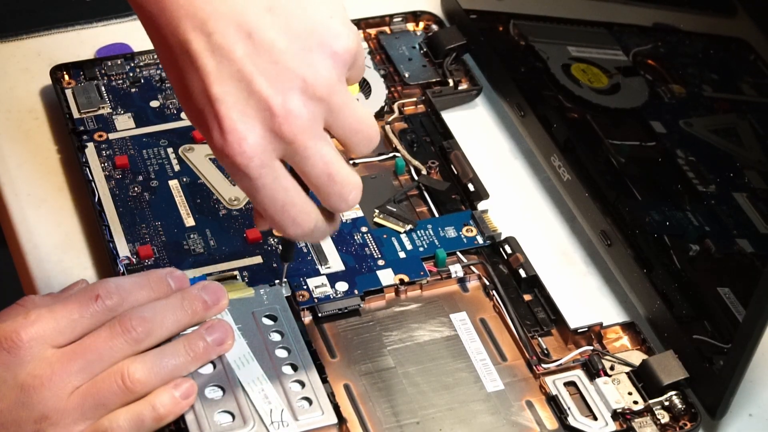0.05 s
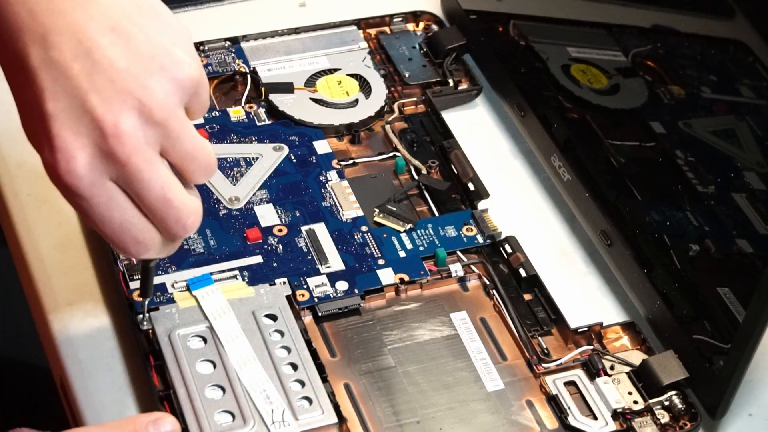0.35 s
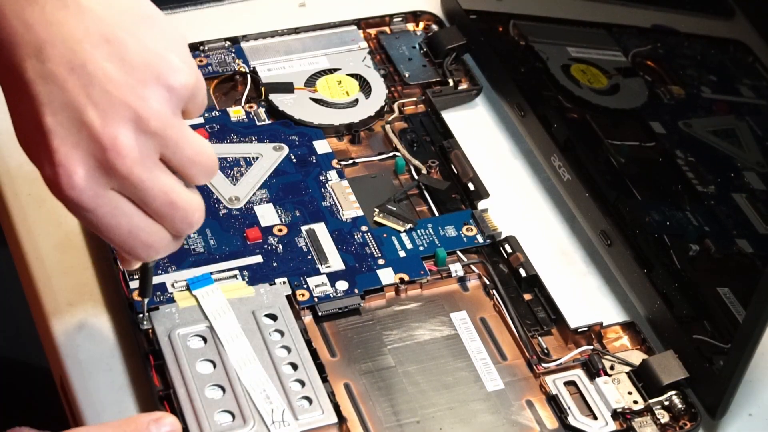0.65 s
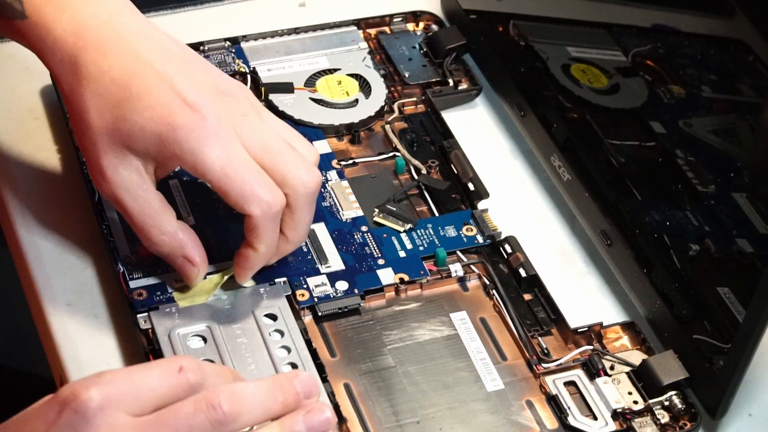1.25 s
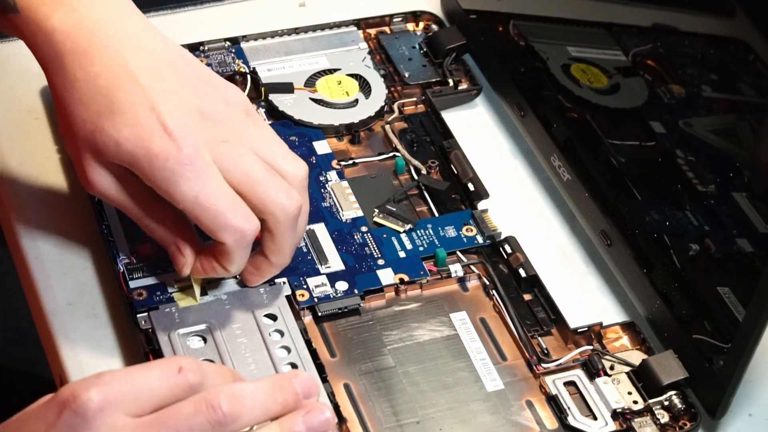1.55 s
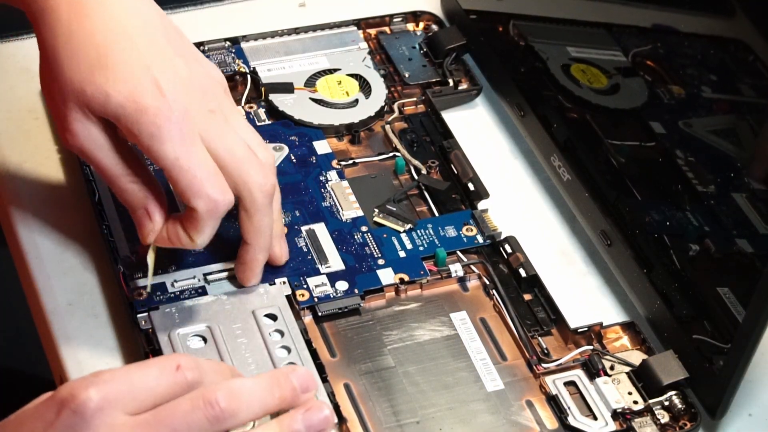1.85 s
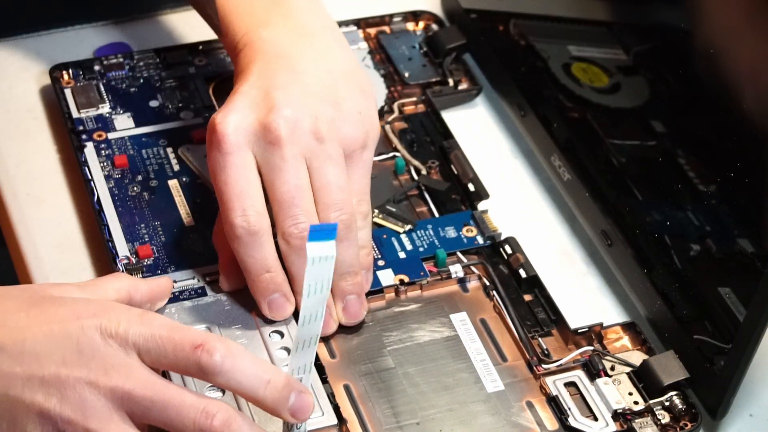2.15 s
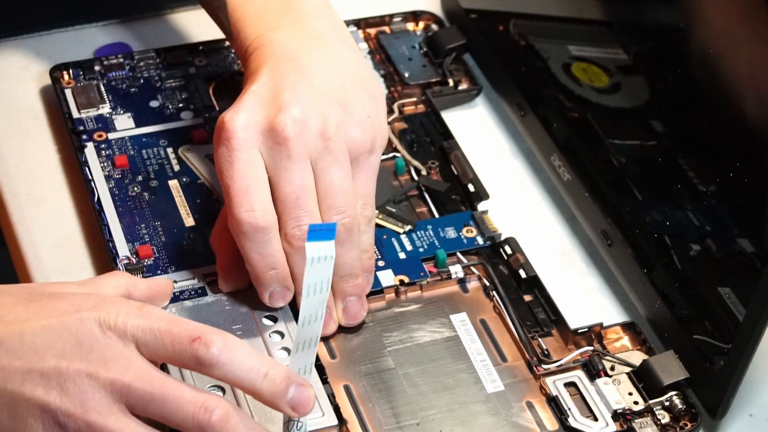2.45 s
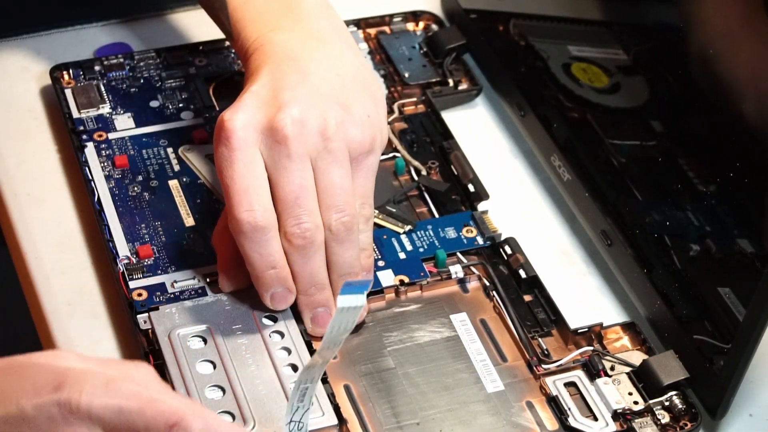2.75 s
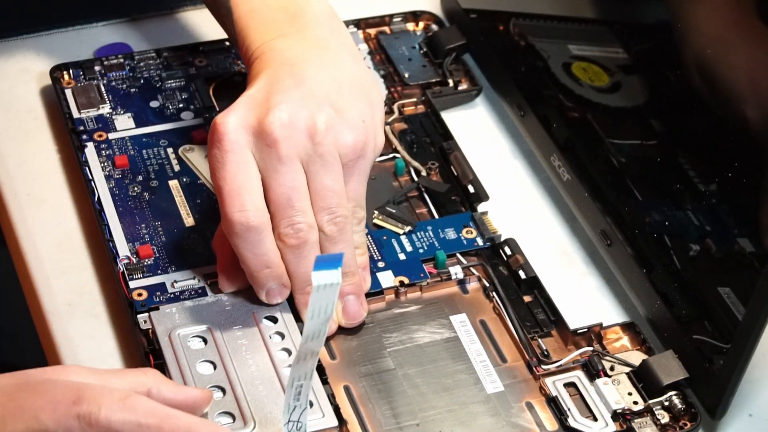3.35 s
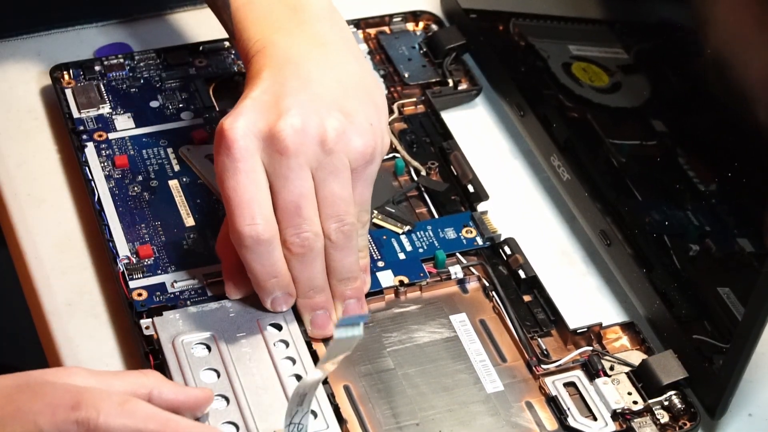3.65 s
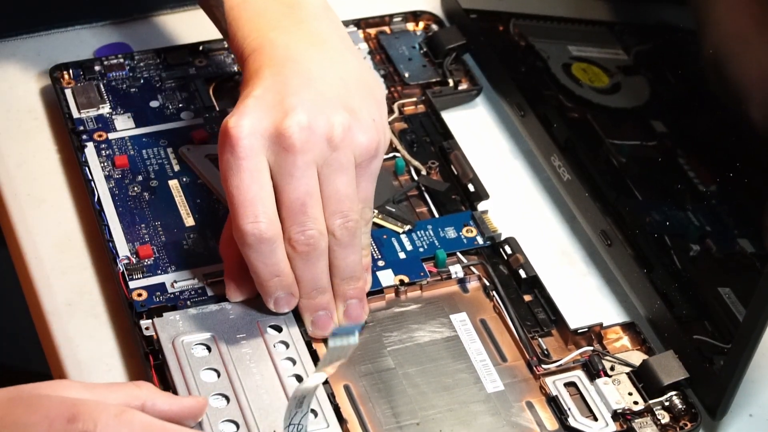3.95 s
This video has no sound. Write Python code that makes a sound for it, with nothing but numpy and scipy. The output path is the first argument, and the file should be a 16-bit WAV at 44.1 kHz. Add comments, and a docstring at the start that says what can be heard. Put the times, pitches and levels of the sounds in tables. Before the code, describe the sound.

A plastic part snaps loudly past its catch in an opened laptop. Before it, fingertips softly brush and tick, tape crackles off in two short runs, and a ribbon cable faintly squeaks. Close up in a quiet room.

```python
"""Inside an opened laptop

Close up in a quiet room, fingertips brush and tick on the parts. A strip of tape tears off the metal
drive bracket in two runs of small snaps as its glue lets go, and a ribbon cable is folded back with a
faint squeak. Then a part is pressed past its catch, and one loud snap shakes the plastic chassis."""
import sys
import numpy as np
from scipy import signal
from scipy.fft import rfft, irfft
from scipy.io import wavfile

SR = 44100
rng = np.random.default_rng(int(sys.argv[2]) if len(sys.argv) > 2 else 0)


def digitize_waveform(pressure):
    """Quantize a signal to 16-bit integers and store it at the path in sys.argv[1].

    Rows of a 2-D input are taken as channels; values are limited to [-1, 1].
    """
    field = np.atleast_2d(pressure).T
    bounded = np.clip(field, -1, 1)
    quanta = np.round(bounded * 32767).astype(np.int16)
    wavfile.write(sys.argv[1], SR, quanta)


N = 176400
TIME = np.arange(N) / SR
BAND_EDGES_HZ = np.geomspace(22, 18000, 21)
BAND_CENTRES_HZ = np.sqrt(BAND_EDGES_HZ[1:] * BAND_EDGES_HZ[:-1])


def from_db(db):
    """Decibels to gain."""
    return 10 ** (np.asarray(db) / 20)


def at_hz(curve, hz):
    """Read a curve on a log-frequency axis."""
    freqs, values = np.transpose(curve)
    return np.interp(np.log(hz), np.log(freqs), values)


def band(x, index):
    """One half-octave band."""
    sos = signal.butter(2, BAND_EDGES_HZ[index:index + 2], "band", fs=SR, output="sos")
    return signal.sosfilt(sos, x + 1e-18)


def low_cut(x, hz):
    """Roll off the bass."""
    return signal.sosfilt(signal.butter(2, hz, "high", fs=SR, output="sos"), x)


def decay(t60):
    """Gain per sample that loses 60 dB in t60 seconds."""
    return np.exp(-np.log(1000) / (t60 * SR))


def impulses(times, heights):
    """Single-sample spikes."""
    return np.bincount((times * SR).astype(int), heights, N)[:N]


def equalise(x, bells):
    """A chain of resonant peaks and dips."""
    for hz, q, db in bells:
        w, gain = 2 * np.pi * hz / SR, from_db(db / 2)
        width, middle = np.sin(w) / (2 * q), -2 * np.cos(w)
        zeros = [1 + width * gain, middle, 1 - width * gain]
        poles = [1 + width / gain, middle, 1 - width / gain]
        x = signal.lfilter(zeros, poles, x)
    return x


def ring(times, hit_db, modes, longest_cycles=170):
    """Each hit sets a body's modes ringing; damping caps their t60, keeping the high ones short."""
    drive = impulses(times, from_db(hit_db)) + 1e-18
    out = 0
    for k, (hz, db, t60) in enumerate(modes):
        r, w = decay(min(t60, longest_cycles / hz)), 2 * np.pi * hz / SR
        mode = signal.lfilter([0, np.sin(w)], [1, -2 * r * np.cos(w), r * r], drive)
        out += (-1) ** k * from_db(db) * mode
    return out


# where a contact's thump, body, click and sizzle sit: (frequency [Hz])
REGISTERS = [200, 900, 4500, 11000]

def contacts(times, levels, ring_times, crack_share):
    """Each contact is a sharp crack and a dense, dying ring; 0 dB has the energy of 1 ms of white noise."""
    out, white = 0, rng.standard_normal((2, N))
    for k, hz in enumerate(BAND_CENTRES_HZ):
        band_db = [np.interp(np.log(hz), np.log(REGISTERS), row) for row in levels]
        hits = impulses(times, np.sqrt(SR / 1000) * from_db(band_db))
        sustain = decay(at_hz(ring_times, hz)) ** 2
        power = signal.lfilter([1 - sustain], [1, -sustain], hits ** 2 + 1e-18)
        crack = (-1) ** k * np.sqrt(crack_share) * hits
        tail = np.sqrt((1 - crack_share) * power) * white[k % 2]
        out += band(crack + tail, k)
    return out


def swell(peak_s, rise_s, fall_s):
    """A bell-shaped envelope with its own attack and release."""
    width = np.where(TIME < peak_s, rise_s, fall_s)
    return np.exp(-np.minimum(((TIME - peak_s) / width) ** 2, 50))


def friction(strokes, spectrum, grains_per_s, spread_db, grain_t60, hiss):
    """Tiny uneven slips, each a brief burst, over a smooth hiss; both swell and fade with each stroke."""
    slips = rng.random(N) < grains_per_s / SR
    grains = slips * from_db(spread_db * np.minimum(rng.exponential(1, N), 3.5))
    bursts = signal.lfilter([1], [1, -decay(grain_t60) ** 2], grains ** 2 + 1e-18)
    texture = rng.standard_normal(N) * np.sqrt((bursts / bursts.mean() + hiss ** 2) / (1 + hiss ** 2))
    envelopes = np.array([swell(*stroke[:3]) for stroke in strokes])
    db, tilt = np.transpose(strokes)[-2:]
    out = 0
    for k, hz in enumerate(BAND_CENTRES_HZ):
        stroke_db = db + tilt * np.log2(hz / REGISTERS[2]) + at_hz(spectrum, hz)
        power = from_db(stroke_db) ** 2 @ envelopes
        out += (-1) ** k * band(texture * np.sqrt(power), k)
    return low_cut(out, hz=140)


# the dark bed of room air: (frequency [Hz], relative level [dB])
AIR_SPECTRUM = [(15, -37), (25, 2), (70, -6.5), (127, 1.5), (185, -6.5), (354, -2.5), (427, -6),
                (818, -10.5), (988, -15.5), (1400, -22), (5880, -26), (14800, -30), (16000, -31.5)]

def room_tone(air_db=-61.5, hum_hz=130, hum_db=-69):
    """Steady soft air and a faint mains hum."""
    hz = np.maximum(np.arange(N // 2 + 1) * SR / N, 1)
    air = irfft(rfft(rng.standard_normal(N)) * from_db(at_hz(AIR_SPECTRUM, hz)), N)
    hum = np.sin(2 * np.pi * hum_hz * TIME)
    return low_cut(from_db(air_db) * air / air.std() + from_db(hum_db) * hum, hz=30)


# soft fingertip strokes: (peak time [s], rise [s], fall [s], level [dB], tilt [dB/octave])
RUBS = [(.005, 0.017, 0.041, -56, -1), (.175, 0.0058, 0.011, -62.5, -1), (.235, 0.025, 0.012, -58, 1),
        (.35, 0.065, 0.098, -62, -1), (.455, 0.021, 0.012, -61, 4), (.55, 0.035, 0.031, -65, -1),
        (.678, 0.036, 0.043, -55, 0), (.9, 0.016, .018, -59.5, -0.5), (.955, 0.032, 0.044, -61, 0),
        (1.05, 0.023, 0.014, -63, -2), (1.17, 0.02, 0.021, -54.5, 2), (1.225, 0.025, 0.0042, -58.5, 0.5)]
# the warm tone of a rub: (frequency [Hz], level [dB])
RUB_SPECTRUM = [(100, 13), (300, 10), (1100, 1), (2500, 4.5), (4800, -1.5), (8000, -7), (12000, -10),
                (16000, -11)]
# boxy plastic resonances, shared by rubs, taps and snap: (frequency [Hz], Q, gain [dB])
PLASTIC_EQ = [(198, 9, 0), (526, 11, 4), (760, 8.1, 2.5), (890, 12, 5), (1000, 11, -5), (1176, 7, 3.5),
              (1450, 14, -1), (2410, 1.58, -3.5), (5300, 6.9, 2.5), (15000, 1.4, -6)]

def finger_rubs():
    """Fingertips brush over the parts, and the plastic colours their friction."""
    rubs = friction(RUBS, RUB_SPECTRUM, grains_per_s=300, spread_db=2.5, grain_t60=0.02, hiss=0.68)
    return equalise(rubs, PLASTIC_EQ)


# light ticks on the parts: (time [s], thump [dB], body [dB], click [dB], sizzle [dB])
TAPS = [(0.351, -25, -55, -40, -50), (0.375, -36, -44, -38, -50), (0.439, -22, -31.5, -37, -93),
        (0.6397, -30, -39.5, -38, -53), (0.668, -42, -39, -54, -46), (0.6985, -39, -31, -29.5, -94),
        (0.8786, -23.5, -33.5, -34, -44.5), (0.899, -31, -47, -42, -57), (0.933, -36, -37, -40.5, -69),
        (0.9761, -39, -35, -32, -85), (1.122, -34, -36, -37.5, -45), (1.148, -22, -38.5, -28, -36),
        (1.194, -23, -39, -38, -70), (1.455, -27, -41, -37, -49.5), (2.209, -27, -20.5, -28, -41),
        (2.252, -35, -34.5, -43.5, -53), (2.4365, -50, -31, -33, -47.5), (2.4435, -21.5, -48, -36, -54),
        (2.663, -45, -30.5, -35, -49), (2.704, -34, -41, -35, -47), (3.2893, -14, -13, -28.5, -38.5),
        (3.713, -18, -23.5, -43, -69), (3.932, -22.5, -32.5, -54.5, -61)]
# the tail of a tap: (frequency [Hz], t60 [s])
TAP_RING = [(150, 0.27), (900, 0.11), (2500, 0.037), (6000, 0.031), (13000, .014)]
# hollow chassis modes, shared by taps and snap: (frequency [Hz], level [dB], t60 before the cap [s])
CHASSIS_MODES = [(76, -37, 0.26), (118, -28, 0.17), (142.6, -24, 0.18), (161.4, -33, 0.31),
                 (224, -30.5, .14), (252, -28, 0.24), (275, -32.5, .26), (296.6, -32.5, .12),
                 (322, -30.5, 0.14), (346.5, -27.5, 0.16), (410, -36.5, .1), (499, -28, 0.069),
                 (540.6, -31, 0.13), (896, -37.5, 0.068), (1066, -33, 0.18), (1216, -34.5, 0.12),
                 (1450, -37, 0.14), (1550, -35.5, .12)]

def taps():
    """Nails and cable tick on the plastic and the board; each thump softly rings the chassis."""
    rows = np.array(TAPS)
    times, levels = rows[:, 0], rows[:, 1:]
    ticks = low_cut(contacts(times, levels, TAP_RING, crack_share=0.17), hz=120)
    chassis = ring(times, levels[:, 0], CHASSIS_MODES)
    return equalise(ticks, PLASTIC_EQ) + from_db(-10.5) * chassis


# the glue lets go in jerks: (time [s], thump [dB], body [dB], click [dB], sizzle [dB])
TAPE_JERKS = [(1.55, -35, -37, -33.5, -38), (1.555, -36, -43, -34, -44), (1.5657, -35, -30, -39, -38),
              (1.572, -16, -16.5, -16.5, -21.5), (1.5858, -21, -22, -17.5, -21),
              (1.5944, -11, -20.5, -13, -23), (1.607, -17.5, -25, -18, -28), (1.728, -51, -38, -32, -39),
              (1.7368, -31, -31, -38, -33), (1.754, -34, -40, -38, -35), (1.7698, -24.5, -25, -29, -26.5),
              (1.7862, -25.5, -27.5, -18.5, -24.5), (1.802, -28.5, -20.5, -35, -26.5)]
# the tail of a jerk: (frequency [Hz], t60 [s])
TAPE_RING = [(150, 0.16), (900, 0.11), (2500, 0.021), (6000, 0.02), (13000, 0.016)]
# picking and peeling strokes: (peak time [s], rise [s], fall [s], level [dB], tilt [dB/octave])
PEELS = [(1.257, 0.0021, 0.0039, -65, 0), (1.33, 0.026, 0.033, -63, 0), (1.345, 0.0035, 0.0046, -56, 1.5),
         (1.38, .002, 0.0028, -59, 3), (1.475, 0.012, 0.027, -61, -4), (1.532, 0.0047, 0.01, -56, .5),
         (1.615, 0.037, 0.035, -48.5, -1), (1.7, 0.0037, .006, -59, 2), (1.735, 0.027, 0.018, -52, -2.5),
         (1.765, 0.016, 0.041, -45, -1.5), (1.798, 0.01, 0.0079, -37.5, -1.5),
         (1.831, .002, 0.0043, -54, -4.5)]
# the bright rasp of peeling: (frequency [Hz], level [dB])
PEEL_SPECTRUM = [(100, 5.5), (1100, -1), (2500, -1.5), (4000, 4.5), (5900, -4), (8600, 7), (12000, -9),
                 (16000, -3)]
# the strip's resonances, and its extra bite while stuck: (frequency [Hz], Q, gain [dB])
TAPE_EQ = [(510, 5.7, -2.5), (880, 9.1, 2), (1194, 22, 8), (2150, 3.4, -4.5), (6800, 6.5, -7), (8670, 4, 4)]
STUCK_EQ = [(4750, 3.1, 5.3)]
# modes of the metal drive bracket: (frequency [Hz], level [dB], t60 before the cap [s])
BRACKET_MODES = [(79, -37, 0.15), (159.8, -25.5, 0.55), (276.7, -26, 0.41), (376.4, -31, 0.25),
                 (769, -28, 0.084), (909, -24, 0.093), (1103, -37, 0.16)]

def tape(comes_free_s=(1.62, 1.73), soak_db=2.5):
    """Tape crackles off in jerks, each plucking the drive bracket, which soaks up some of the thump."""
    rows = np.array(TAPE_JERKS)
    times, levels = rows[:, 0], rows[:, 1:]
    jerks = contacts(times, levels - [soak_db, 0, 0, 0], TAPE_RING, crack_share=0.083)
    jerks = low_cut(jerks, hz=132)
    stuck = np.interp(TIME, comes_free_s, [1, 0])
    jerks = equalise(jerks * stuck, STUCK_EQ) + jerks * (1 - stuck)
    peel = friction(PEELS, PEEL_SPECTRUM, grains_per_s=1500, spread_db=3, grain_t60=0.0023, hiss=0.64)
    bracket = ring(times, levels[:, 0], BRACKET_MODES)
    return from_db(-2) * equalise(jerks + peel, TAPE_EQ) + bracket


# squeaks, pings and low rings: (time [s], pitch [Hz], half length [s], level [dB])
SQUEAKS = [(1.346, 3750, 0.0042, -59), (1.7585, 9300, 0.00095, -30), (2.440, 4790, 0.0051, -47.5),
           (2.441, 3850, 0.005, -47), (2.438, 5720, .0035, -51), (2.464, 302, .016, -52),
           (2.602, 3500, 0.0067, -43.5), (3.291, 7030, 0.00084, -35.5), (3.714, 4370, 0.00051, -41.5),
           (3.933, 1238, 0.0031, -46.5)]

def squeaks(bandwidth_share=0.005):
    """Cable and plastic give short, narrow chirps whose pitch trembles at random."""
    tremble = np.cumsum(rng.standard_normal(N))
    out = 0
    for time, hz, half_s, db in SQUEAKS:
        phase = 2 * np.pi * hz * TIME + np.sqrt(2 * np.pi * bandwidth_share * hz / SR) * tremble
        out += from_db(db) * swell(time, half_s, half_s) * np.sin(phase)
    return out


# moves of the cable: (peak time [s], rise [s], fall [s], level [dB], tilt [dB/octave])
CABLE_SLIDES = [(2.597, 0.026, 0.0085, -53.5, 0), (2.655, 0.011, 0.015, -61, -4.5),
                (2.708, 0.0086, 0.0058, -55, -0.5), (2.738, 0.011, 0.017, -59.5, -3),
                (3.9, 0.048, 0.028, -66, -1.5)]
# the tone of its swish: (frequency [Hz], level [dB])
CABLE_SPECTRUM = [(150, 2.5), (1200, 7), (2400, -7), (3600, 1.5), (5200, 3), (8000, -4), (16000, -21)]

def ribbon_cable():
    """The smooth cable slides with a fine-grained swish as it is bent."""
    return friction(CABLE_SLIDES, CABLE_SPECTRUM,
                    grains_per_s=2500, spread_db=3.5, grain_t60=0.0051, hiss=1.0)


# the edge drags on its catch: (peak time [s], rise [s], fall [s], level [dB], tilt [dB/octave])
SCRAPES = [(3.511, 0.0052, 0.0092, -21, -1), (3.5025, 0.003, .003, -34.5, 3.5),
           (3.493, 0.0045, .006, -41.5, -1.5), (3.46, 0.024, 0.033, -60, -3.5)]
# the gritty tone of that scrape: (frequency [Hz], level [dB])
SCRAPE_SPECTRUM = [(200, 3.5), (1200, 2.5), (2500, 2), (4000, 6.5), (5600, 4), (8000, -2), (12000, -5),
                   (16000, -15.5)]
# the snap, first slip to last rattle: (time [s], thump [dB], body [dB], click [dB], sizzle [dB])
SNAP_HITS = [(3.4988, -26, -24, -24.5, -38), (3.505, -28, -24, -26.5, -20), (3.5066, -7.5, 2, -20.5, -20.5),
             (3.5117, -10, -11, -8, -17), (3.5155, -12.5, -10, -13, -22.5), (3.5212, -2.5, -10, -18.5, -30),
             (3.5315, -19.5, -18, -24, -40), (3.5369, -11.5, -25, -28.5, -46),
             (3.5404, -20.5, -21, -17.5, -38.5), (3.5504, -26, -19.5, -29, -46.5),
             (3.574, -19, -27, -31, -52)]
# the tight tail of each hit: (frequency [Hz], t60 [s])
SNAP_RING = [(150, 0.033), (900, 0.014), (2500, 0.047), (6000, 0.028), (13000, 0.014)]
# the catch jumps two notches: (time [s], level [dB])
NOTCHES = [(3.5116, 0), (3.5157, -1.5)]
# ping of the catch, dry knock of the panel under it: (frequency [Hz], level [dB], t60 [s])
CATCH_MODES = [(4610, -12.5, 0.006), (5660, -3.5, 0.0038), (5670, -24, .03)]
PANEL_MODES = [(511, -21, .028), (793, -18.5, .022), (1350, -14.5, 0.0098)]

def snap():
    """A part scrapes past its catch, breaks free with two cracks and rattles while the chassis booms."""
    rows = np.array(SNAP_HITS)
    times, levels = rows[:, 0], rows[:, 1:]
    hits = low_cut(contacts(times, levels, SNAP_RING, crack_share=0.15), hz=108.9)
    scrape = friction(SCRAPES, SCRAPE_SPECTRUM,
                      grains_per_s=2700, spread_db=0.5, grain_t60=0.003, hiss=0.65)
    boom = ring(times, levels[:, 0], CHASSIS_MODES)
    knock = ring(times, levels[:, 1], PANEL_MODES)
    notch_times, notch_db = np.transpose(NOTCHES)
    cracks = ring(notch_times, notch_db, CATCH_MODES)
    return from_db(-0.5) * equalise(hits + scrape, PLASTIC_EQ) + boom + knock + cracks


# the room's decay: (frequency [Hz], t60 [s])
ROOM_DECAY = [(150, 0.29), (900, 0.25), (4500, 0.22), (8000, 0.22), (13000, 0.22)]
# reverb send: (frequency [Hz], level [dB])
ROOM_SEND = [(150, -7.5), (900, -10.5), (4500, -12.5), (13000, -21.5)]

def room_reverb(x, build_up_s=0.0056):
    """A short diffuse tail, duller as it dies."""
    n = np.arange(SR // 2)
    white, response = rng.standard_normal((2, len(n))), 0
    build_up = 1 - np.exp(-(n / (build_up_s * SR)) ** 2)
    for k, hz in enumerate(BAND_CENTRES_HZ):
        envelope = build_up * decay(at_hz(ROOM_DECAY, hz)) ** n
        tail = band(white[k % 2] * envelope / np.linalg.norm(envelope), k)
        response += from_db(at_hz(ROOM_SEND, hz)) * tail
    return signal.fftconvolve(x, response)[:N]


def scene():
    """All the handling and its reverb over the room tone, in mono."""
    handling = finger_rubs() + taps() + tape() + squeaks() + ribbon_cable() + snap()
    return (handling + room_reverb(handling) + room_tone())[None]


def record(dry, cutoff_hz=16000):
    """A steep high cut on the mix."""
    return signal.sosfilt(signal.ellip(10, .2, 75, cutoff_hz, fs=SR, output="sos"), dry)


dry = scene()
out = record(dry)
digitize_waveform(out)
```